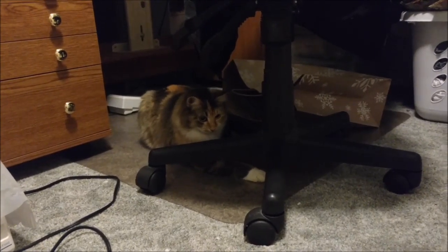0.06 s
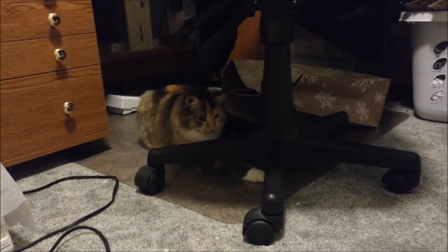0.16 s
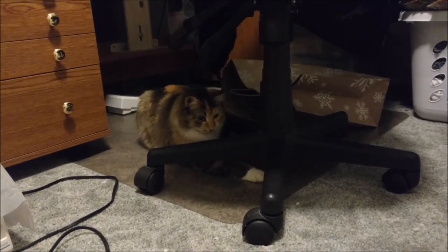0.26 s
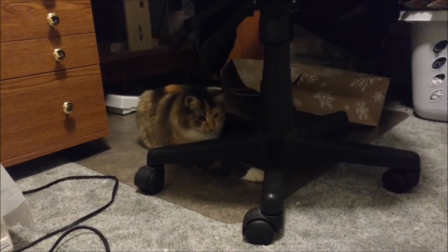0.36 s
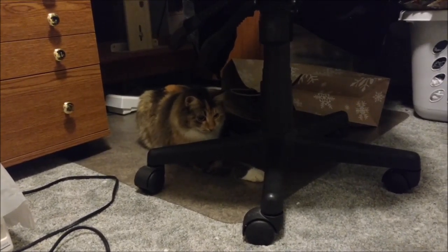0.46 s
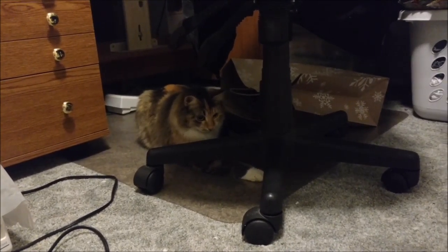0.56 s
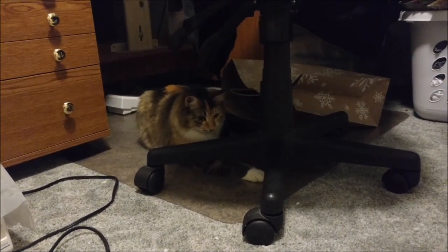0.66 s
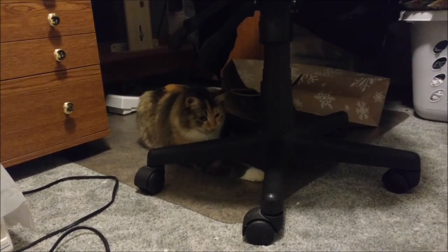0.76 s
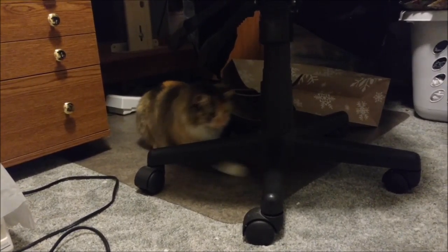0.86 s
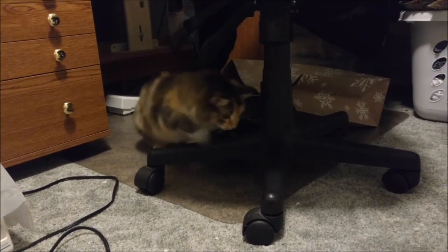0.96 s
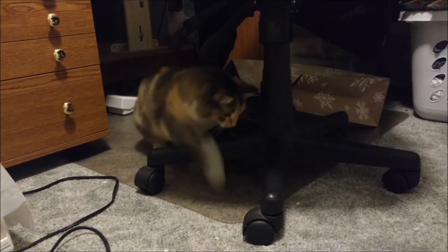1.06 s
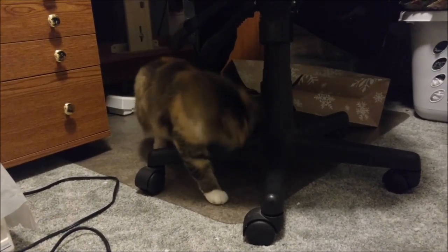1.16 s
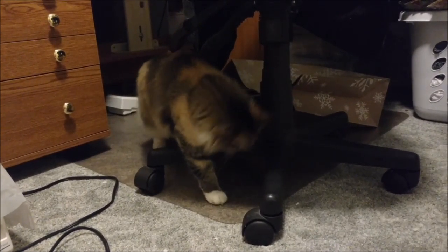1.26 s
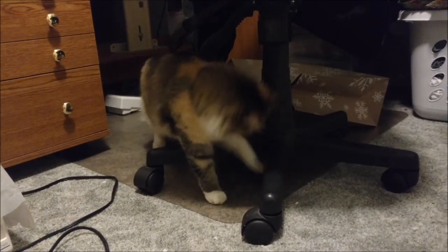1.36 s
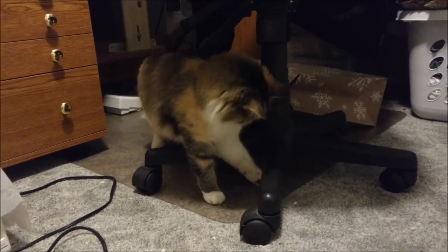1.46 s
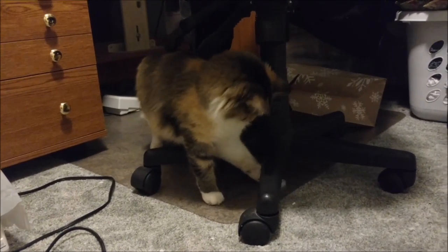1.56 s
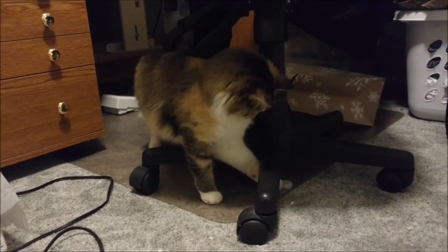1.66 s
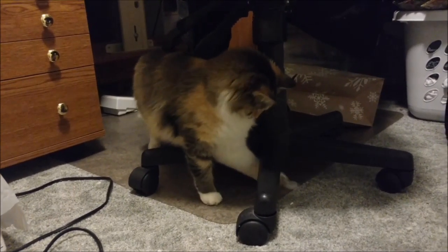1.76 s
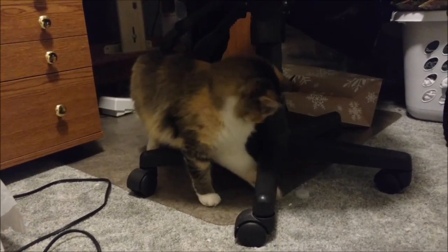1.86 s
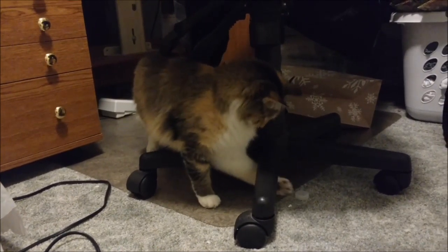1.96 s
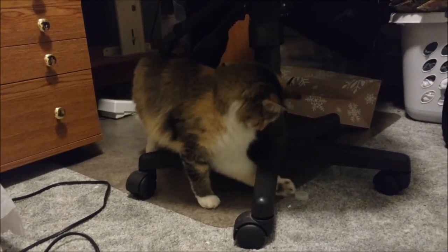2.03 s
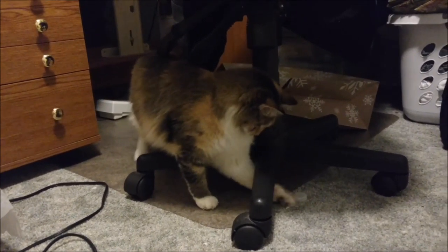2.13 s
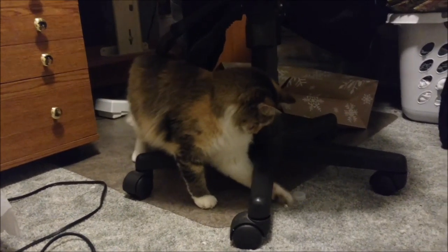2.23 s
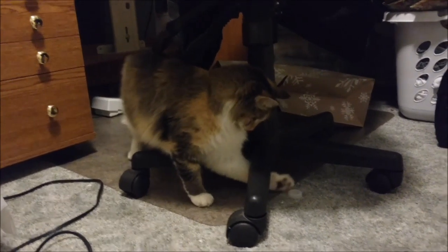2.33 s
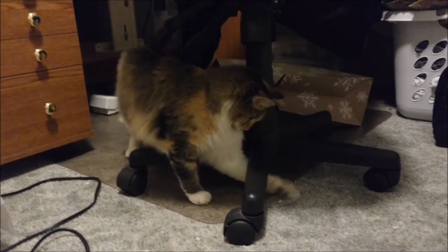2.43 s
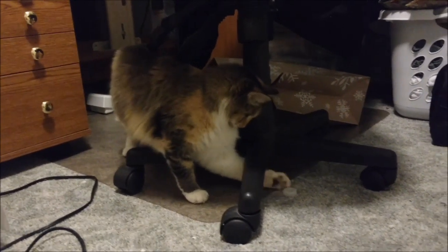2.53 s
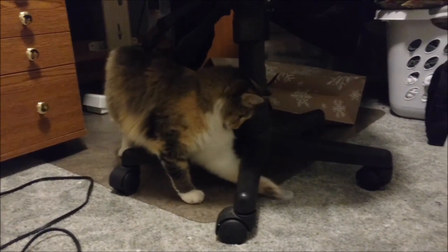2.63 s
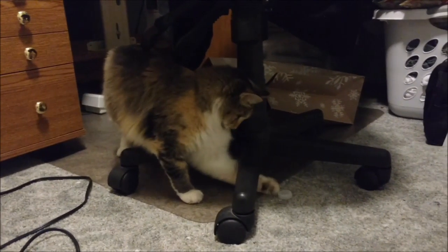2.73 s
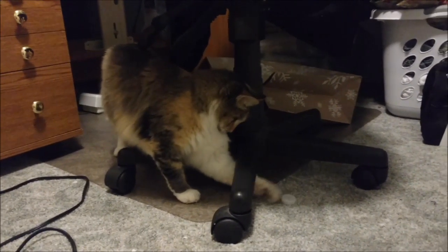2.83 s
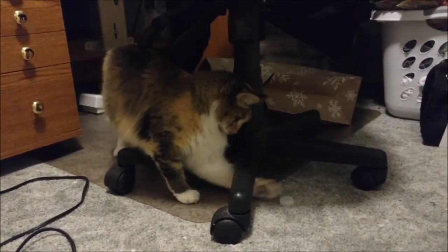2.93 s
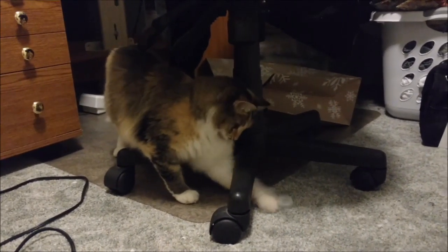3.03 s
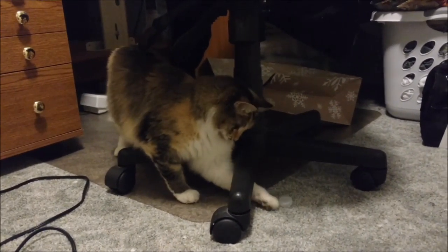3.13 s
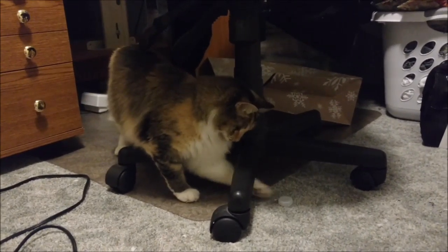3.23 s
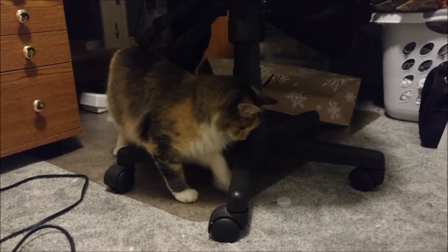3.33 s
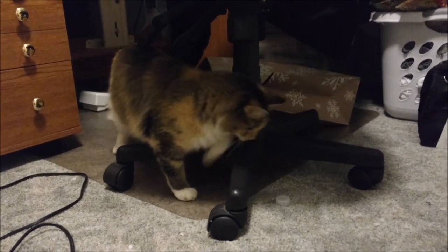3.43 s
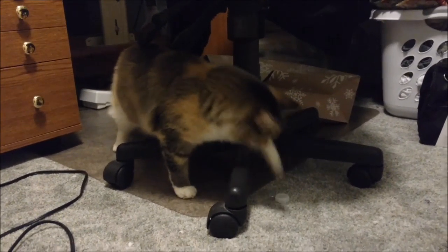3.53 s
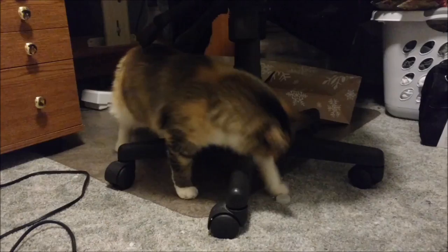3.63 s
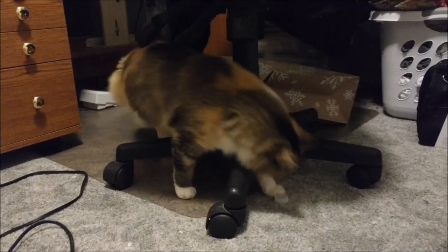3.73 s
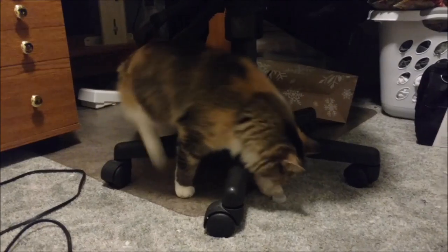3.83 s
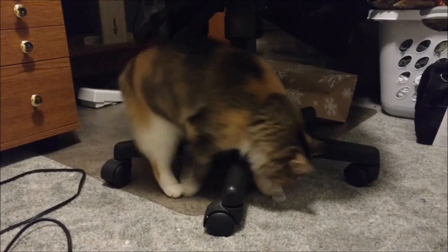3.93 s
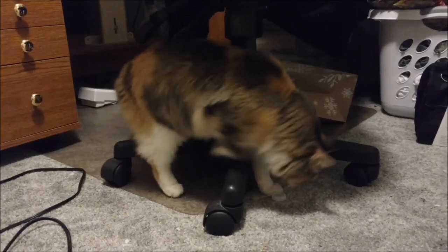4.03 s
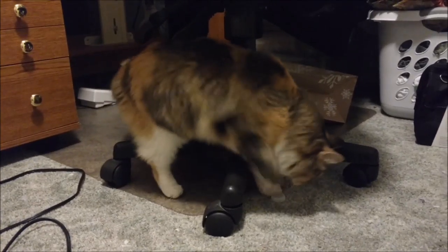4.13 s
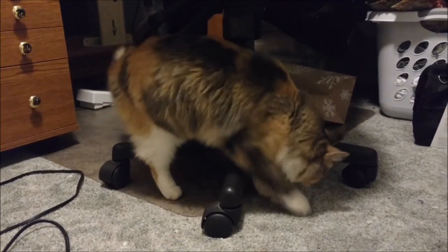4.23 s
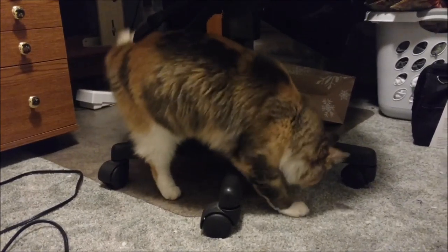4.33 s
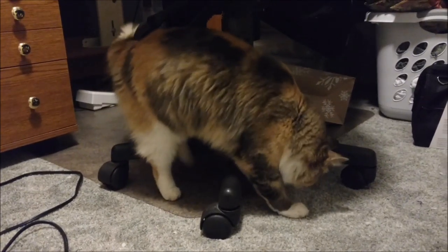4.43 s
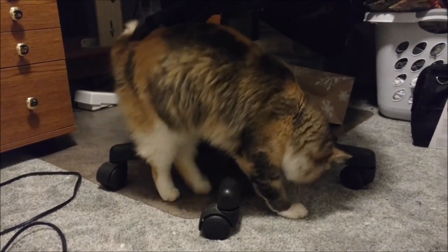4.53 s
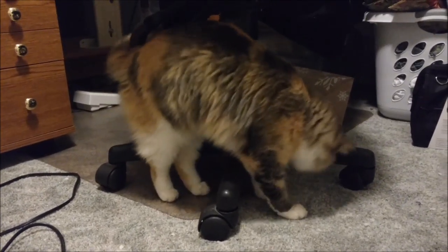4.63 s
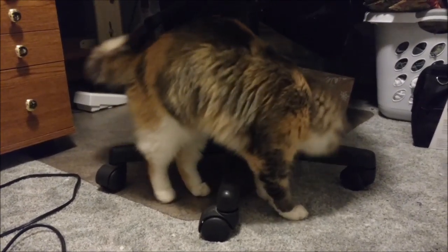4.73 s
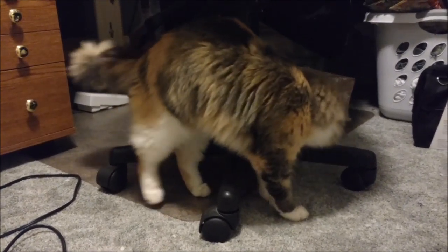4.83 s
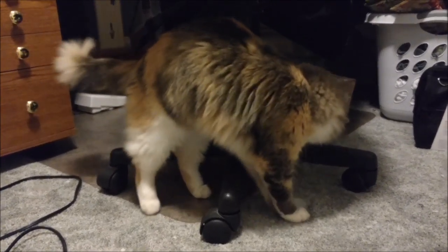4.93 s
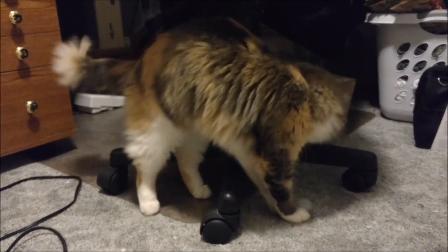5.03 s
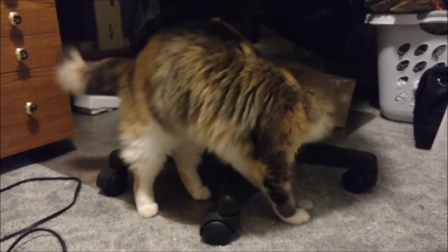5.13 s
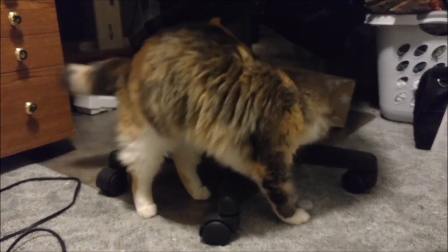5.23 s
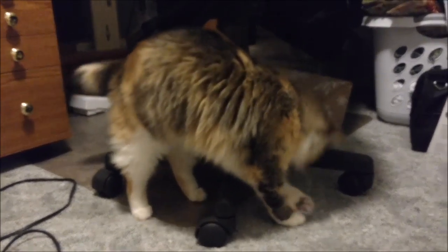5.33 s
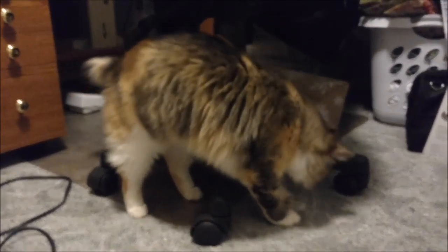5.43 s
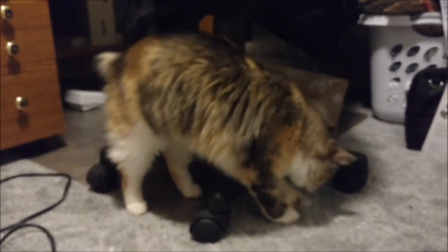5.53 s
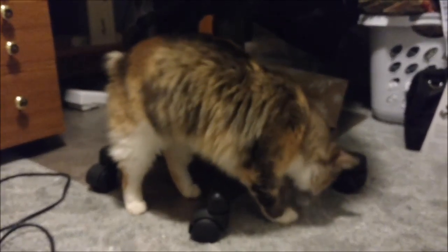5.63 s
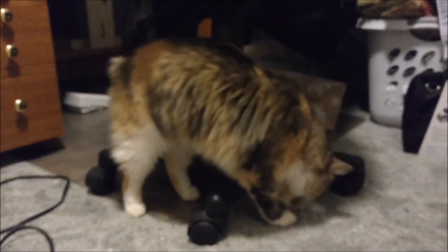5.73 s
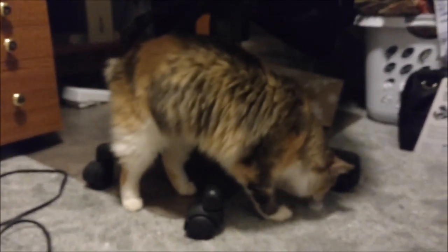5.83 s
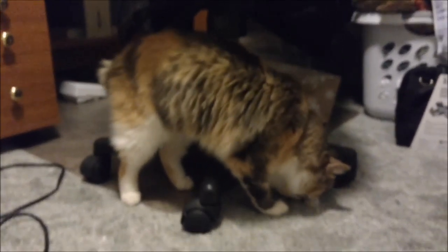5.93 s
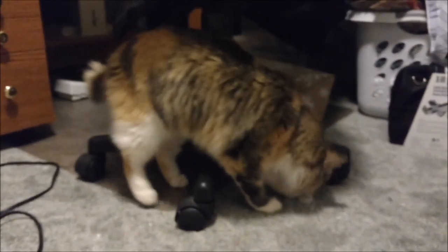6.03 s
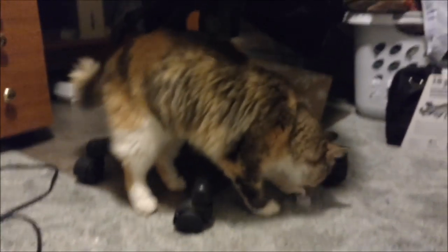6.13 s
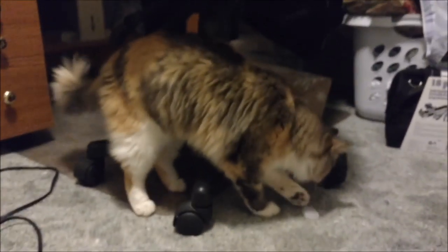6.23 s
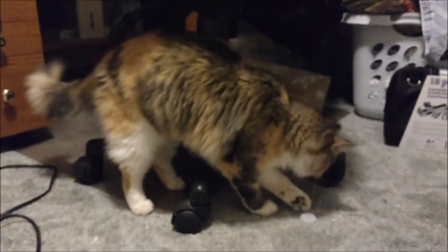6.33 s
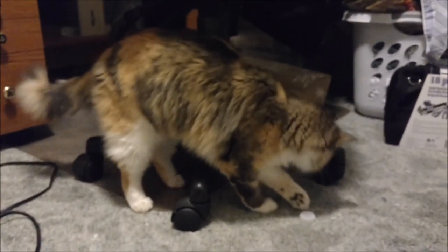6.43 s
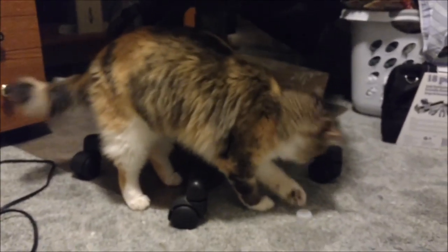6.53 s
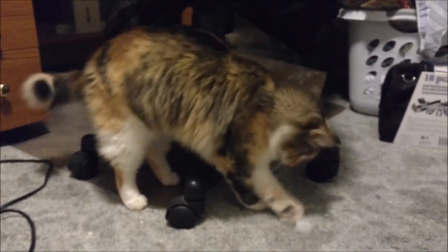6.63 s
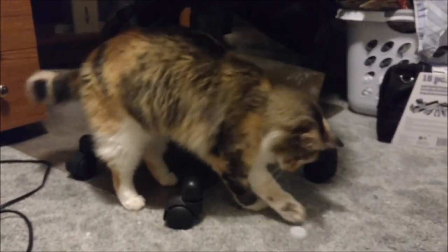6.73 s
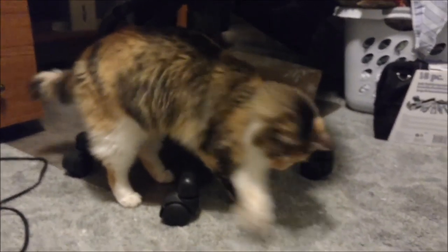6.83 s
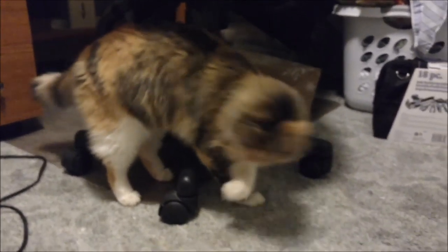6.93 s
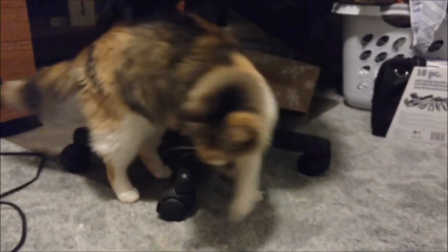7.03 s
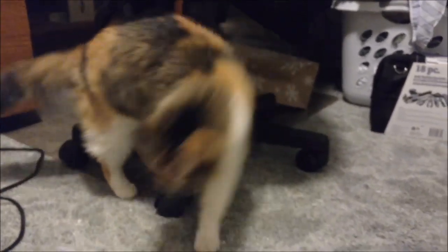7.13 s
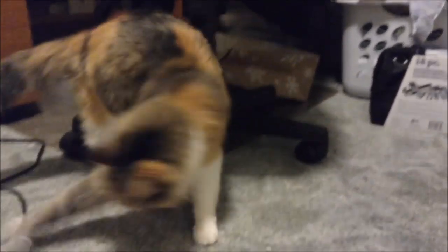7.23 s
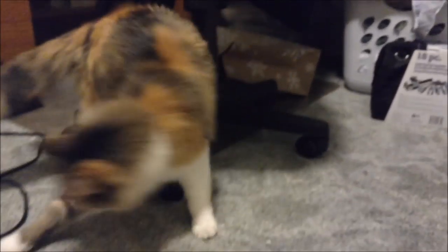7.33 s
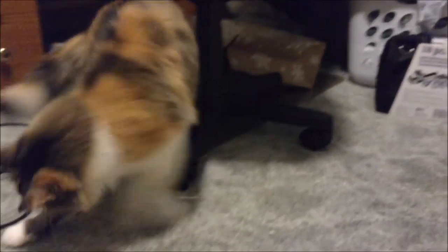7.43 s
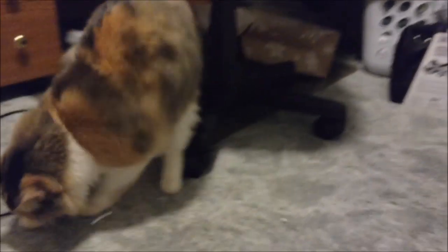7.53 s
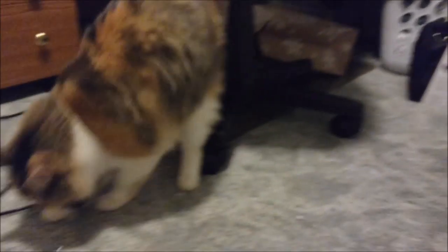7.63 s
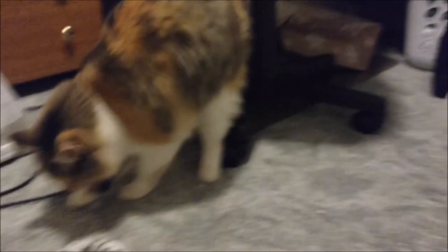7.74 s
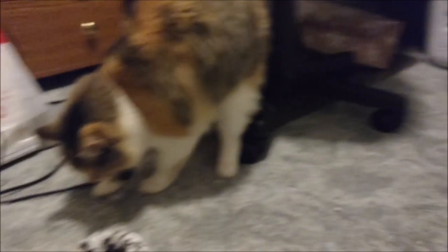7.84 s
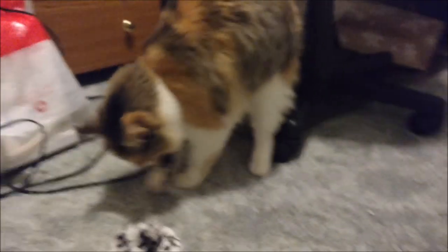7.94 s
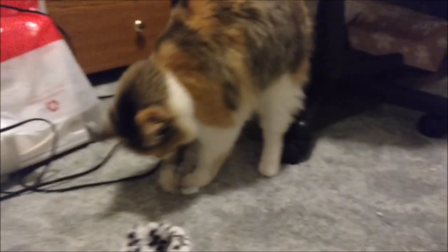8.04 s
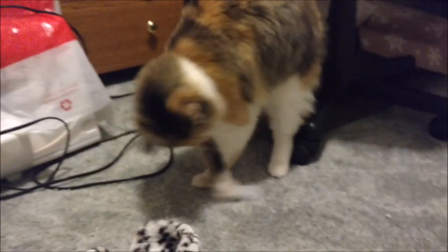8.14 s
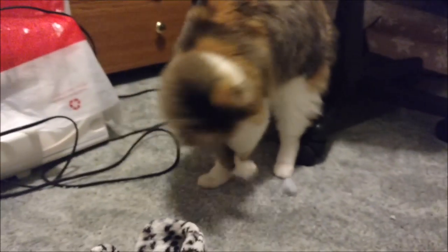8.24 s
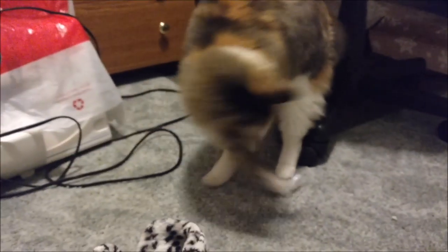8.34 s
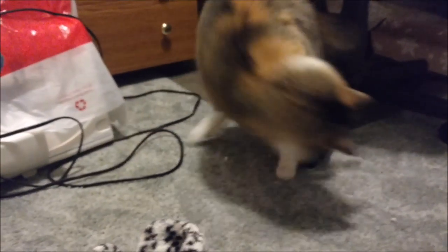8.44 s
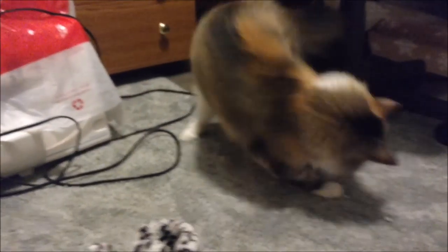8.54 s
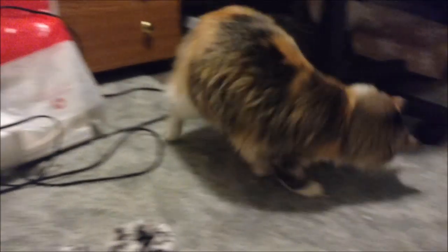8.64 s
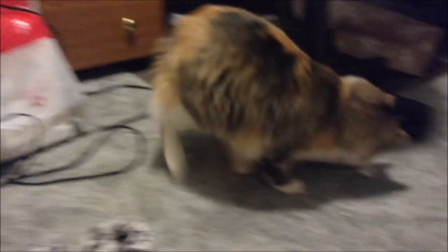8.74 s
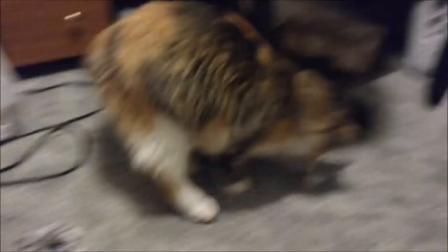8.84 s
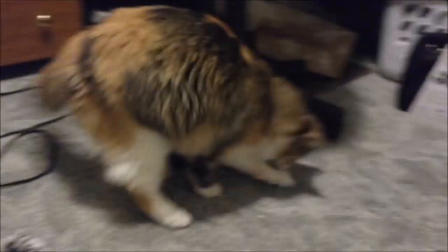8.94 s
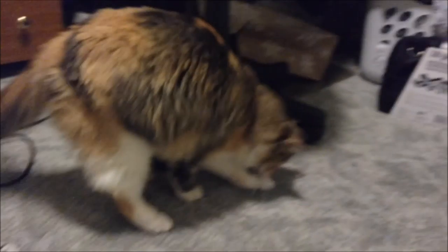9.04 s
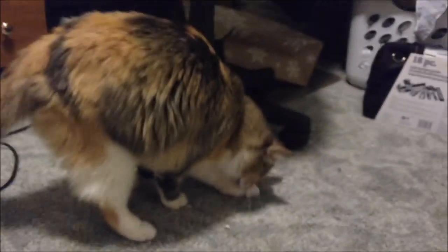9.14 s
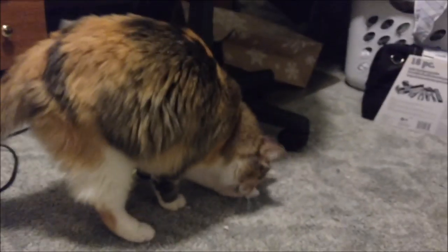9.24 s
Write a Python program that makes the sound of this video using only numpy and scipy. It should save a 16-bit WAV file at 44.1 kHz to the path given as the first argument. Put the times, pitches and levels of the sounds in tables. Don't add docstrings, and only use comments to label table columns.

```python
import sys
import numpy as np
from scipy import signal
from scipy.fft import rfft, irfft, next_fast_len
from scipy.io import wavfile
from scipy.ndimage import map_coordinates

SR = 44100
rng = np.random.default_rng(int(sys.argv[2]) if len(sys.argv) > 2 else 0)


def materialize(psi):
    bounded = np.clip(np.atleast_2d(psi).T, -1, 1)
    quanta = np.round(bounded * 32767).astype(np.int16)
    wavfile.write(sys.argv[1], SR, quanta)


def nominal_scale(level):
    x = np.asarray(level, float) / 20
    return 10 ** x


N = 409248

# hz, level_db (per Hz)
HISS_COLOUR = [(20, -11), (60, 8.5), (200, 10), (500, 2.5), (1000, 0), (2000, -4), (5000, -8), (10000, -15),
               (15500, -21.5)]
# hz, level_db (per Hz)
DRONE_COLOUR = [(25, -26), (60, -18), (110, 1), (150, -5.5), (200, 3), (250, -3.5), (320, -9.5),
                (420, -6.5), (700, -19), (1100, -18), (2000, -69)]
# pitch_hz, early_db, late_db, unsteadiness
HUM_TONES = [(59, -69, -66, 0.27), (198.1, -55, -55.5, 0.56), (214.2, -69, -72, 0.49),
             (240, -58.5, -61, 0.21), (294, -69, -55, 0.65)]
# time_s, level_db
RECORDER_GAIN = [(0, -61.5), (1, -62.5), (2, -61), (5, -62.5), (6, -61.5), (9.28, -61)]

# peak_s, level_db, rise_s, fall_s, rim_share_db
SKID_STROKES = [(0.002, -50.5, 0.0022, 0.073, -27), (2.471, -50.5, 0.032, 0.082, -3),
                (2.7, -54, 0.13, 0.074, -6.5), (2.849, -56.5, 0.0059, 0.078, -9),
                (3.046, -48.5, .012, 0.037, -8), (3.075, -53.5, 0.028, 0.12, -6),
                (3.097, -48.5, 0.054, 0.018, -8), (5.391, -61.5, 0.021, 0.037, 2.5),
                (5.546, -47.5, .008, 0.05, -10.5), (5.572, -53, .003, 0.056, -14),
                (5.548, -52, .006, .02, -12), (5.372, -62, .003, 0.087, -19), (8.052, -60, .006, .04, -15),
                (5.765, -57.5, .006, 0.069, -9), (8.79, -55, 0.028, 0.099, -10),
                (6.25, -63.5, .004, 0.58, -14), (6.678, -59.5, .003, 0.21, -4),
                (6.857, -43, .003, 0.051, -12), (7.042, -64, 0.087, .03, -7),
                (7.852, -61.5, 0.065, 0.065, -6), (7.986, -53.5, 0.038, 0.026, -5.5),
                (8.135, -52.5, 0.047, 0.069, -13), (8.229, -52, 0.007, 0.045, -7),
                (8.962, -59, .003, 0.14, -1)]
# time_s, pressure_db
DRAG_PRESSURE = [(1.499, -47), (1.511, -33), (1.525, -32.5), (1.547, -37), (1.581, -42), (1.587, -48),
                 (1.609, -41.5), (1.639, -54.5), (1.665, -41.5), (1.689, -36.5), (1.72, -43.5),
                 (1.779, -46.5), (1.799, -43), (1.803, -44), (1.833, -46), (1.885, -74)]
# pitch_hz, width_hz, level_db
DRAGGED_CUP = [(3450, 480, -10), (3765, 125, 3.5)]
# pitch_hz, width_hz, level_db
TUMBLING_CUP = [(3640, 430, 0)]
# pitch_hz, width_hz, level_db
MAT_RASP = [(1407, 195, 10.5), (1585, 160, 11), (1938, 124, 13.5), (1525, 250, 4.5), (2520, 1500, 7.5),
            (860, 330, 3)]
# pitch_hz, width_hz, level_db
MAT_FLEX = [(2300, 480, 0), (2930, 940, -7)]
# pitch_hz, width_hz, level_db
CAP_RIM = [(6060, 1100, 2.5), (9970, 820, 2.5), (7440, 32000, -2.5)]

# hz, t60_s
ROOM_DECAY = [(150, 0.058), (1000, 0.18), (4000, 0.16), (7000, 0.081), (12000, 0.1)]

# start_s, level_db, board_hz, upper_board_hz, upper_share_db
PAW_FALLS = [(1.148, -32, 185, 364, -5), (1.296, -36, 210, 605, -15), (1.505, -44, 196, 403, -4),
             (3.243, -50, 208, 343, 2), (3.977, -34, 190, 393, -6.5), (4.586, -41.5, 223, 377, -7),
             (7.049, -43, 183, 366, -24), (7.328, -43, 200, 400, -4), (7.3415, -30, 206, 431, -9),
             (7.3429, -30.5, 294, 380, -30), (7.355, -52, 208, 363, 6.5), (7.556, -37.5, 172, 352, -11),
             (7.969, -53, 286, 314, -15), (8.404, -52, 188, 450, -9), (8.514, -48, 195, 400, -6),
             (8.528, -48, 400, 500, -14), (8.627, -31.5, 302, 355, -3.5), (8.569, -33.5, 190, 393, -12),
             (8.598, -28.5, 240, 302, -9), (8.613, -28.5, 255, 308, 1.5), (8.6219, -24.5, 260.5, 346, -9.5),
             (8.636, -33, 358, 350, -4), (8.957, -45, 246, 498, -5.5)]
# start_s, level_db, low_share_db, high_share_db
CLAW_TEARS = [(1.1497, -59, 6, -20), (1.5227, -29, -6.5, -34), (1.6856, -44.5, 4, -36),
              (1.8297, -34.5, -13, -31), (3.052, -37, -30, -24), (3.243, -54, 2, -14), (3.98, -52, 1, -1),
              (5.982, -57.5, 6, -17), (6.8949, -36, -17, 5), (6.9012, -43, -23, 8), (7.334, -41, -5, -10),
              (7.3416, -39, -7, -4), (7.46, -63, 7, -15), (8.4046, -35.5, -2, 6), (8.408, -34.5, -12, -5),
              (8.589, -33.5, -10.5, 7), (8.6136, -27, -6, -2), (8.71, -59, 8, -16),
              (8.955, -48.5, 0.5, 13.5)]
# start_s, level_db, low_share_db, high_share_db
FIBRE_SNAPS = [(1.2976, -54, 7, -25), (5.751, -38, -15, 0), (6.243, -45, -5, -13), (6.6711, -41, -8, -10),
               (8.769, -48.5, -1, 20.5), (8.79, -56, -12, 13), (9.0258, -42.5, -4, 12.5),
               (9.0323, -46.5, -1, 2), (9.047, -52, -10, 10), (9.057, -36, -13.5, 14), (9.06, -47, -14, 12)]
# start_s, level_db, top_hz
HARD_CLICKS = [(1.2968, -40, 2500), (3.2457, -44, 5000), (4.5858, -34.5, 4000), (5.7521, -30, 9100),
               (6.8946, -32, 12000), (3.9777, -36, 3000), (5.8915, -40, 1200), (5.8952, -42, 3500),
               (5.9153, -43, 2500), (5.92, -40, 1800), (5.9478, -41, 3500), (3.6931, -42, 4500),
               (3.7553, -40, 4500)]

# peak_s, level_db, rise_s, fall_s
FUR_SWEEPS = [(5.395, -55.5, .03, 0.046), (7.347, -47, .035, 0.048), (8.41, -52, .006, 0.062),
              (8.59, -43.5, 0.0044, 0.047), (1.52, -56, .04, 0.064), (1.838, -60, .04, 0.13)]
# hz, level_db (per Hz)
FUR_COLOUR = [(1500, -22), (3000, -15), (4500, 9.5), (7000, -6), (11500, 4), (15800, -4)]
# peak_s, level_db, rise_s, fall_s
PILE_STROKES = [(2.194, -56, 0.12, 0.14), (3.238, -52.5, 0.022, 0.023), (5.392, -69, 0.021, 0.03),
                (5.894, -52, 0.015, 0.0092), (5.918, -50, 0.022, 0.018), (5.95, -48, 0.018, 0.013),
                (6.238, -59.5, 0.13, 0.15), (7.116, -57.5, 0.035, 0.13), (7.218, -58, 0.054, 0.14),
                (7.588, -56, 0.16, .08), (7.838, -58.5, 0.041, .16), (8.429, -52, 0.16, 0.047),
                (8.532, -47, 0.043, 0.09), (8.632, -53, .003, 0.16), (9.0, -70, .04, .15)]
# hz, level_db (per Hz)
PILE_COLOUR = [(400, 12), (1000, 1.5), (2500, 0.5), (4500, 4), (7000, -6), (11000, -10.5), (15500, -20)]

# start_s, level_db, swing_hz, direction
FINGER_JOLTS = [(1.4898, -40, 110, 1), (2.236, -37, 130, -1), (2.4563, -36, 129, 1), (2.5663, -47, 110, -1),
                (5.5378, -28.5, 112, 1), (5.787, -37, 130, -1), (5.8264, -29, 135, -1),
                (5.876, -34, 112, 1), (5.8974, -31, 131, 1), (5.935, -22, 150, -1), (5.9686, -34, 90, 1),
                (6.042, -36.5, 131, 1), (7.238, -41, 180, -1), (7.342, -38, 220, -1), (7.367, -38, 110, 1),
                (7.4209, -37, 112, 1), (7.6396, -45, 150, -1), (7.8025, -39, 90, -1), (7.861, -52, 180, -1),
                (7.899, -45, 90, 1), (8.725, -38, 150, 1), (8.7624, -38, 91, 1), (8.8585, -38, 90, -1),
                (8.8932, -29.5, 148, -1), (8.948, -45, 220, 1), (8.9684, -34, 133, 1), (8.995, -39, 180, 1),
                (9.13, -42, 130, 1), (9.1668, -40, 150, 1)]
# from_s, to_s
PANS = [(7.499, 8.06), (8.62, 9.05)]

# pitch_hz, level_db, t60_s
CAP_MODES = [
    (3654, 3, 0.022),
    (3560, -1.5, 0.011),
    (6150, 10, 0.011),
    (10300, 8, 0.013),
    (9390, 5.5, 0.017),
    (1220, -7.5, 0.0046),
    (2230, -18, 0.0042),
]
# start_s, level_db, skirt_share_db, knock_share_db, pitch_ratio
MAT_CONTACTS = [(1.5005, -37, -22, 5, 0.92), (1.5083, -38, -18, 5, 0.63), (1.5125, -28, -20, 8, 0.89),
                (1.5166, -33, -16, -7, 0.86), (1.5221, -24, -9.5, -15, 0.98), (1.528, -35, -18, -11, 1.03),
                (1.5333, -30, -18, -5, 0.9), (1.541, -36, -20, -3, 1.1), (1.5516, -40, -22, -5, 0.79),
                (1.555, -37, -22, -5, 0.98), (1.566, -40, -24, -5, 1.03), (1.5727, -32.5, -31, 0, 1),
                (1.5952, -36, -30, -5, 1.03), (1.6075, -35, -27, -7, 1.025), (1.648, -59, -26, 0, 0.93),
                (1.657, -42, -23, -5, 0.89), (1.6676, -34, -24, 3, 1.06), (1.6745, -35, -22, -3, 1.03),
                (1.6871, -25, -17, -18, 0.97), (1.701, -29.5, -24, -8, 1), (1.7126, -32, -27, -1, 0.98),
                (1.7227, -38, -25, -6, 0.98), (1.733, -37, -27, -8, 1.03), (1.7506, -37, -27, -6, 0.96),
                (1.757, -43, -25, -6, 1.03), (1.7854, -45, -20, -3, 0.93), (1.7957, -39, -19, -5, 0.95),
                (1.8143, -37, -14, -5, 1.02), (1.8237, -36, -18, -7, 1.0), (1.828, -36, -16, -6, 0.95),
                (1.8327, -30.5, -20, -10, 0.96), (1.8382, -35, -20, -8, 1.03), (1.8445, -39, -20, -8, 1),
                (1.852, -39, -20, -8, 1.02)]
# start_s, level_db, skirt_share_db, knock_share_db, pan_db
FREE_CONTACTS = [(2.8434, -43, -12, -14, 0), (2.851, -46, -12, -14, 0), (3.0504, -38.5, -16, -8, 1),
                 (3.0984, -32.5, -8.5, 3, -1), (3.693, -35.5, -19, -7, -6), (3.7553, -26, -17.5, -18, -8.5),
                 (7.3288, -50, -25, -15, -18), (6.8645, -36, -14, -20, -5), (8.2385, -50, -7, -15, -5),
                 (4.9857, -48, -22, 15, -4), (5.368, -46, -25, -15, -7), (5.5376, -44, -22, -18, -6),
                 (5.5453, -43, -19, -15, -1.5), (5.5698, -44, -33, 17, -8), (5.7524, -48.5, -7, -15, -23),
                 (6.2428, -37.5, -2, 2, -3), (6.6711, -36.5, -8, 1, -9), (6.8447, -24, -18, -3, -6),
                 (6.8513, -27, -5.5, -32, -6), (6.894, -35.5, 5.5, 14, 6), (6.9025, -48.5, 11, -15, 3),
                 (7.326, -41.5, -28, 6, -21), (8.0484, -52, -21, -10, 3), (8.12, -44, -20, -15, 3),
                 (8.1465, -28.5, -21, -23, 1), (8.194, -32, -20, -4, 9.5), (8.405, -36.5, -14, -10, -6),
                 (8.2272, -45, -20, -13, -14), (8.77, -36, -25, 10.5, -19.5), (8.955, -41, -1, -6, -2),
                 (8.983, -43.5, -14, -7, -6)]
# delay_s, level_db
FURNITURE = [(.0065, -11), (.011, -16), (.016, -31), (.0205, -26.5), (.026, -29), (.033, -29), (.042, -26)]
# start_s, level_db, pitch_hz, t60_s
PINGS = [(3.051, -47, 1400, 0.06), (7.3424, -32, 690, .035), (7.3424, -33, 955, .03),
         (7.345, -39, 432, .05), (7.345, -40, 538, .04), (3.978, -44, 560, .04),
         (7.966, -45, 1350, .03), (7.974, -46, 720, .04), (8.412, -42, 1400, .04),
         (8.42, -42, 870, .06), (8.408, -40, 1660, .04), (8.408, -43, 940, .04),
         (8.424, -42, 1140, .04), (8.613, -34, 610, .04), (8.614, -30, 1726, .05),
         (8.615, -37, 1900, .05), (8.616, -35, 1360, .06), (8.626, -38, 1130, .05),
         (8.632, -39, 1450, .04), (8.626, -41, 2150, .03), (8.618, -31, 890, .08),
         (8.71, -47, 1400, .03)]


def unit(x):
    return x / np.sqrt(np.mean(x ** 2) + 1e-20)


def along(points, hz):
    f, v = np.transpose(points)
    return np.interp(np.log(hz + 1), np.log(f + 1), v)


def curve(rows):
    times, values = np.transpose(rows)
    return np.interp(np.arange(N) / SR, times, values)


def wobble(rate):
    knots = rng.standard_normal(int(N * rate / SR) + 4)
    return map_coordinates(knots, [np.arange(N) * rate / SR])


def add(out, s, sound):
    part = out[..., round(s * SR):round(s * SR) + sound.shape[-1]]
    part += sound[..., :part.shape[-1]]


def strokes(rows, extra_db=0):
    rise_db, fall_db = 26.5, 27
    out = np.zeros(N)
    for (s, db, rise, fall), more_db in zip(np.array(rows)[:, :4], extra_db + np.zeros(len(rows))):
        t = np.arange(max(s - rise, 0), s + fall, 1 / SR)
        shape_db = np.interp(t, [s - rise, s, s + fall], [-rise_db, 0, -fall_db])
        add(out, t[0], nominal_scale(db + more_db + shape_db))
    return out


def filtered(x, response):
    m = next_fast_len(N + 8192)
    return irfft(rfft(x, m) * response(np.fft.rfftfreq(m, 1 / SR)), m)[..., :N]


def coloured(x, spectrum):
    return unit(filtered(x, lambda hz: nominal_scale(along(spectrum, hz))))


def peak(f, hz, width):
    return 1j * f * width / (hz * hz - f * f + 1j * f * width)


def resonated(x, modes):
    return unit(filtered(x, lambda f: sum(nominal_scale(db) * peak(f, hz, w) ** 2 for hz, w, db in modes)))


def grit(rate, spread_db):
    hits = rng.random(N) < rate / SR
    return unit(hits * rng.standard_normal(N) * nominal_scale(spread_db * rng.exponential(size=N)))


def ring(hz, t60, t):
    return nominal_scale(-60 * t / t60) * np.sin(2 * np.pi * hz * t)


def ports(pair, lag=1.3):
    lead = np.array([[-1], [1]])
    return filtered(pair, lambda hz: np.exp(1j * np.pi * hz * lag / SR * lead))


def background():
    gain_db = curve(RECORDER_GAIN)
    hiss = nominal_scale(gain_db + [[-.5], [1.5]]) * coloured(rng.standard_normal((2, N)), HISS_COLOUR)
    drone_db = gain_db.mean() + 6 + 1.9 * (gain_db - gain_db.mean()) + 0.097 * wobble(2.7)
    drone = nominal_scale(drone_db) * coloured(rng.standard_normal((1, N)), DRONE_COLOUR)
    t = np.arange(N) / SR
    turned = 1 / (1 + np.exp((6.1 - t) / 1.14))
    hum = np.zeros(N)
    for hz, early_db, late_db, unsteady in HUM_TONES:
        level_db = early_db + (late_db - early_db) * turned + 2.3 * unsteady * wobble(4.4)
        hum += nominal_scale(level_db) * np.sin(2 * np.pi * hz * t + unsteady * wobble(4.2))
    bass = ports((drone + hum) * nominal_scale([[.4], [-.4]]), lag=12.5)
    return nominal_scale(4.0) * hiss + bass


def skids():
    shake = nominal_scale(1.74 * wobble(110))
    t = np.arange(N) / SR
    held = (t > DRAG_PRESSURE[0][0]) * (t < DRAG_PRESSURE[-1][0])
    drag = nominal_scale(curve(DRAG_PRESSURE)) * held

    dust = grit(5000, spread_db=-6.0) * shake
    cup = resonated(dust, DRAGGED_CUP) * drag * nominal_scale(-3.5)
    cup = cup + resonated(dust, TUMBLING_CUP) * strokes(SKID_STROKES)

    broad = np.array([grit(3500, spread_db=3.0) for _ in range(3)])
    rasp = resonated((0.84 * broad[0] + 0.5 * broad[1:]) * shake, MAT_RASP)
    rasp = rasp * (nominal_scale(-7) * drag + strokes(SKID_STROKES, -13))

    rim_share_db = np.array(SKID_STROKES)[:, -1]
    fizz = resonated(grit(5900, spread_db=0.0) * shake, CAP_RIM)
    fizz = fizz * (nominal_scale(-28) * drag + strokes(SKID_STROKES, rim_share_db))

    flex = nominal_scale(-2) * resonated(grit(3500, spread_db=4.0) * shake, MAT_FLEX) * drag
    flex = flex * np.array([[-.7], [.7]])
    return nominal_scale([[-6.5], [.6]]) * cup + nominal_scale(2.5) * rasp + flex + nominal_scale(2.5) * fizz * nominal_scale([[-1.5], [1.5]])


def room(x):
    hz, t, z = signal.stft(rng.standard_normal((2, SR // 3)), SR, nperseg=256)
    alike = hz < 600
    z[1, alike] = z[0, alike]
    decay = nominal_scale(-60 * t / along(ROOM_DECAY, hz)[:, None])
    tail = signal.istft(z * decay, SR, nperseg=256)[1]
    delayed = np.pad(x.mean(0), (480, 0))[None]
    return signal.fftconvolve(delayed, tail / np.linalg.norm(tail[0]), axes=1)[:, :N]


def paws():
    press_s, softens = .012, .45
    upper_modes = [(1, 3), (1.24, -0.5), (1.92, -5), (2.8, -2.5)]  # ratio, level_db
    out, t = np.zeros(N), np.arange(SR // 5) / SR
    for s, db, hz, upper_hz, upper_db in PAW_FALLS:
        t60 = .04 - .0008 * upper_db
        boards = ring(hz, t60, t) * nominal_scale(-6.0 + 60 * np.minimum(t, press_s) / t60)
        for k, g in upper_modes:
            mode_db = g - 4.0 + upper_db * (1.5 + softens * (k - 1.5))
            boards += nominal_scale(mode_db) * ring(k * upper_hz, 1.39 * t60 / k ** 0.92, t)
        add(out, s, nominal_scale(db + 6.0) * boards * (1 - np.exp(-t / 0.0011)))
    thud = filtered(out, lambda f: peak(f, 460, 3900) ** 2)
    return ports(thud * nominal_scale([[.75], [-.75]]), lag=4)


def claws():
    bands = [(1200, 4000), (4400, 3500), (9800, 3300)]  # pitch_hz, width_hz
    out, t = np.zeros((3, 2, N)), np.arange(SR // 12) / SR
    lives = [0.039] * len(CLAW_TEARS) + [0.015] * len(FIBRE_SNAPS)
    for (s, db, low_db, high_db), life in zip([*CLAW_TEARS, *FIBRE_SNAPS], lives):
        shared = rng.standard_normal((3, 1, len(t)))
        tear = 0.57 * shared + 0.36 * rng.standard_normal((3, 2, len(t)))
        band_t60 = (life * np.array([1.3, .9, .55]))[:, None, None]
        shape = nominal_scale(-60 * t / band_t60) * (1 - np.exp(-t / (0.013 * life)))
        band_db = db + 5.5 + np.array([low_db + 7.5, 0, high_db])
        add(out, s, nominal_scale(band_db)[:, None, None] * tear * shape)
    mixed = sum(filtered(x, lambda f: peak(f, hz, w) ** 2) for x, (hz, w) in zip(out, bands))
    return mixed * nominal_scale([[-1.2], [1.2]])


def clicks():
    out = np.zeros(N)
    for s, db, top_hz in HARD_CLICKS:
        u = np.arange(SR // 100) / SR * top_hz * 2.4
        add(out, s + .0001, nominal_scale(db + 4) * u * (u - 2) * np.exp(-u))
    return out


def swish():
    return coloured(grit(4800, spread_db=2.0), FUR_COLOUR) * strokes(FUR_SWEEPS)


def jolts():
    swings, creaks, t = np.zeros(N), np.zeros((2, N)), np.arange(SR // 12) / SR
    for s, db, hz, direction in [*FINGER_JOLTS, *fidgets()]:
        cycles = np.arange(int(3 * SR / hz)) * hz / SR
        swing = 2.8 * cycles * np.exp(1 - 3.4 * cycles) * np.sin(2 * np.pi * cycles)
        add(swings, s, np.sign(direction) * nominal_scale(db + 5.0) * (swing - swing.mean()))
        shape = nominal_scale(db + 10.5 - 60 * t / 0.069) * (1 - np.exp(-t / 0.0062))
        add(creaks, s, shape * rng.standard_normal((2, len(t))))
    swings = filtered(swings, lambda f: peak(f, 254, 580))
    return swings * np.array([[.4], [-1.2]]) + filtered(creaks, lambda f: peak(f, 223, 416) ** 2)


def taps():
    mat_pan_db = -3
    push_s, rebound = .00005, 4
    out, t = np.zeros((2, N)), np.arange(SR // 16) / SR
    push = nominal_scale(6) * (np.exp(-t / push_s) - np.exp(-t / (rebound * push_s)) / rebound)
    rows = [(s, db, skirt, knock, mat_pan_db, pitch) for s, db, skirt, knock, pitch in MAT_CONTACTS]
    rows += [(*row, 1) for row in FREE_CONTACTS]
    for s, db, skirt_db, knock_db, pan_db, pitch in rows:
        rim_db = -29 + (0.79 - 1) * (db + 42.0) + 0.56 * (skirt_db + 11.0)
        share_db = [0, 0, skirt_db, rim_db + 15.0, rim_db + 8.5, knock_db, knock_db]
        detune = 1 + .003 * rng.standard_normal(len(CAP_MODES))
        modes = [nominal_scale(g + k) * ring(hz * d * pitch, t60, t)
                 for (hz, g, t60), k, d in zip(CAP_MODES, share_db, detune)]
        cup = nominal_scale(1.5) * sum(modes[:2]) * (1 - np.exp(-t / .0002))
        body = cup + sum(modes[2:]) * (1 - np.exp(-t / 0.000065))
        crack_db = (rim_db + knock_db) / 2 + 8.5 - 60 * t / 0.0064
        crack = nominal_scale(crack_db) * rng.standard_normal(len(t))
        add(out, s, nominal_scale(db - 7.5) * (body + crack + push) * nominal_scale([[pan_db / 2], [-pan_db / 2]]))
    return out


def walls(x):
    delays_s, levels_db = np.transpose(FURNITURE)
    late = delays_s + .0004 * rng.standard_normal((2, len(FURNITURE)))

    def copies(f):
        return sum(nominal_scale(db) * np.exp(-2j * np.pi * f * late[:, k:k + 1]) for k, db in enumerate(levels_db))
    return filtered(x, lambda f: copies(f) * peak(f, 3300, 3000))


def brushing():
    fibres = np.array([grit(3500, spread_db=-2.0) for _ in range(3)])
    pair = 0.31 * fibres[0] + 0.5 * fibres[1:]
    return nominal_scale(2.0) * coloured(pair, PILE_COLOUR) * strokes(PILE_STROKES)


def pings():
    out, t = np.zeros(N), np.arange(SR // 16) / SR
    for s, db, hz, t60 in PINGS:
        add(out, s, nominal_scale(db) * ring(hz, t60, t) * (1 - np.exp(-t / 0.0015)))
    return out


def fidgets(count=6):
    rows = []
    for start, end in PANS:
        for u, v, w, d in rng.random((count, 4)):
            rows.append((start + (end - start) * u, -41.5 + 6 * (v - .5), 119 * 2 ** (w - .5), d - .5))
    return rows


def scene():
    ticks = taps()
    cap = ticks + skids() + pings()
    feet = paws() + claws() + clicks()
    near = ports(cap + feet + brushing() + swish())
    soaked = filtered(nominal_scale(-14.5) * cap + nominal_scale(-8.0) * feet, lambda hz: 1 / (1 + (hz / 6500) ** 4))
    return near + walls(ticks) + room(soaked) + jolts() + background()


def roll_off(x):
    return signal.sosfilt(signal.butter(12, 16180, fs=SR, output="sos"), x)


def record(dry):
    feed, lag, top_hz = 0.58, 17.18, 15450
    late = filtered(dry[::-1], lambda hz: np.exp(-2j * np.pi * hz * lag / SR))
    wide = filtered(dry - feed * late, lambda hz: nominal_scale(-.045 * np.maximum(hz - top_hz, 0)))
    return roll_off(wide)


dry = scene()
out = record(dry)
materialize(out)
```